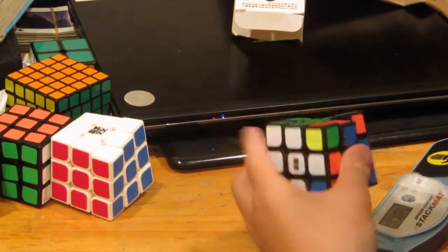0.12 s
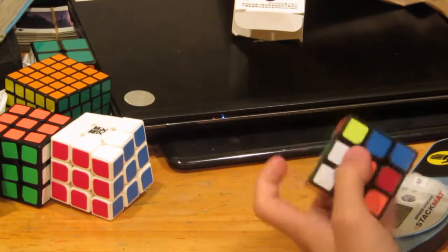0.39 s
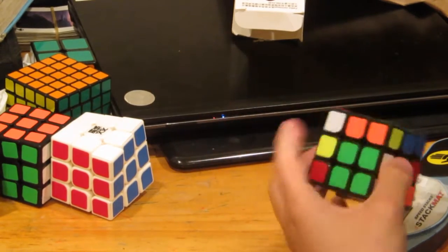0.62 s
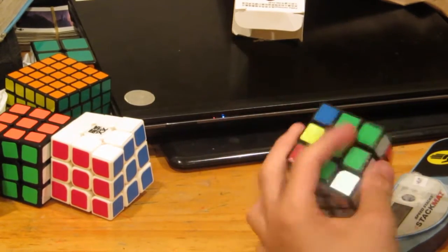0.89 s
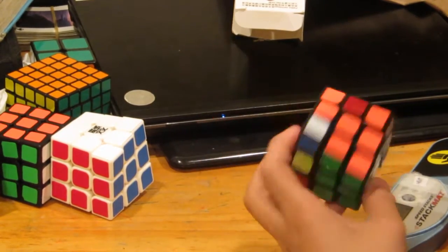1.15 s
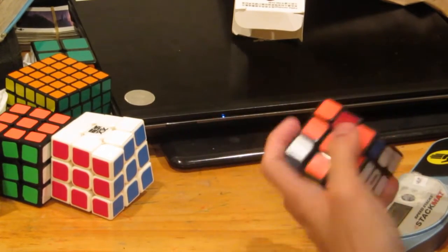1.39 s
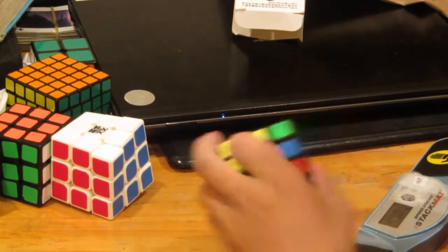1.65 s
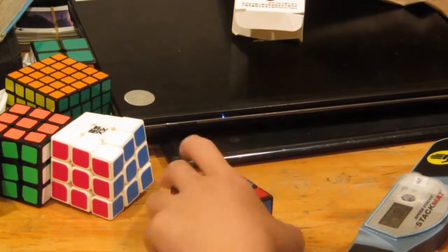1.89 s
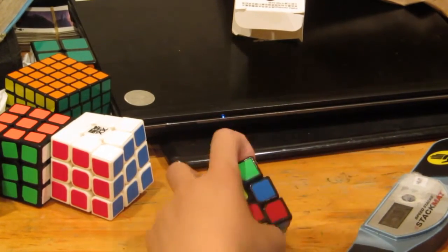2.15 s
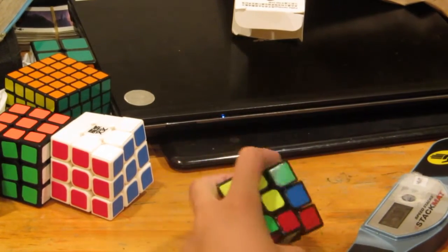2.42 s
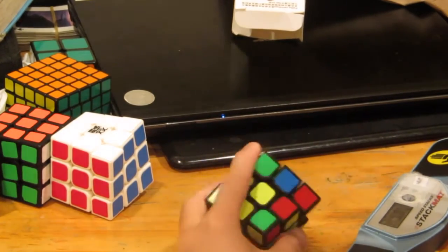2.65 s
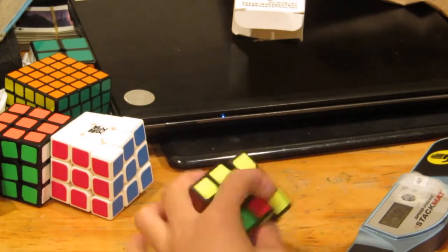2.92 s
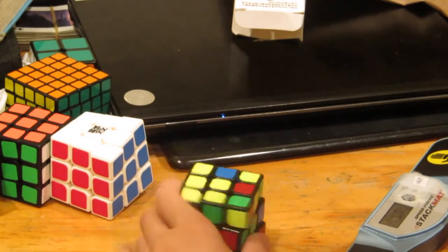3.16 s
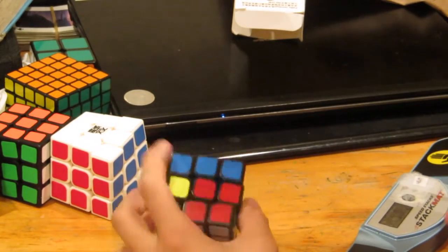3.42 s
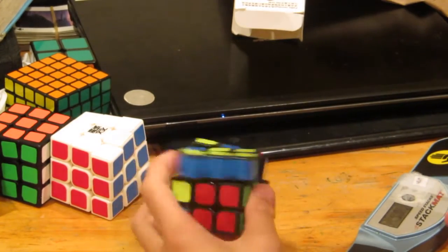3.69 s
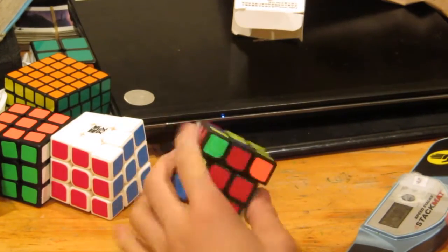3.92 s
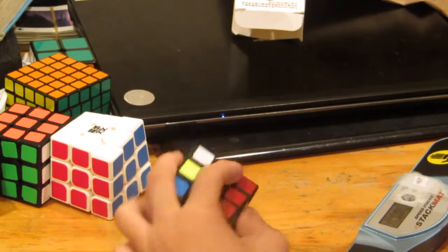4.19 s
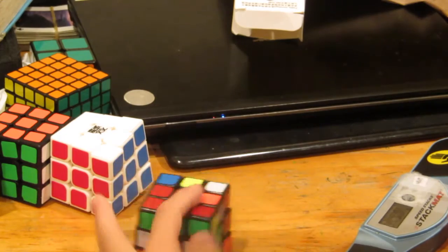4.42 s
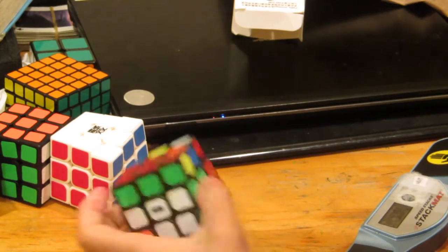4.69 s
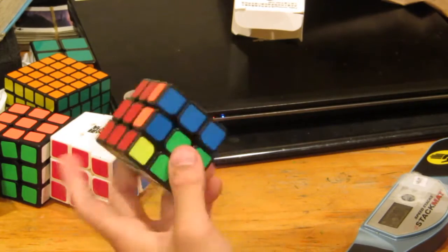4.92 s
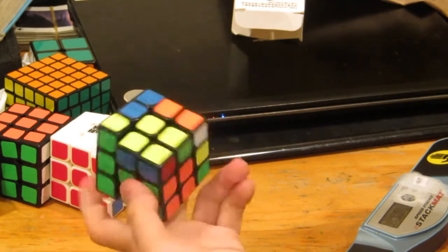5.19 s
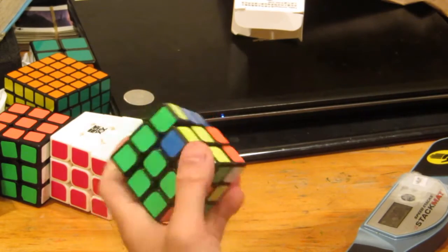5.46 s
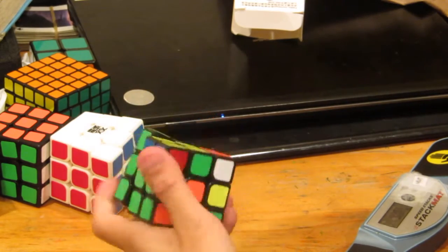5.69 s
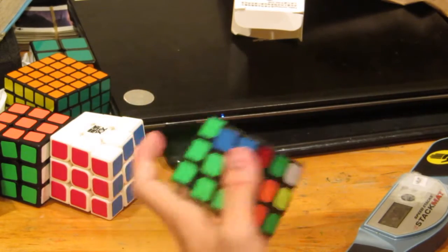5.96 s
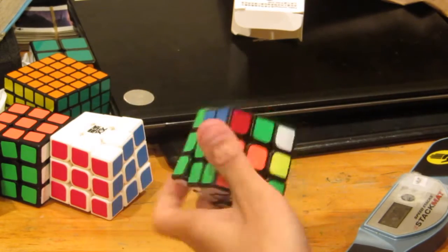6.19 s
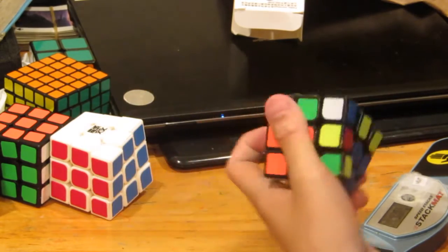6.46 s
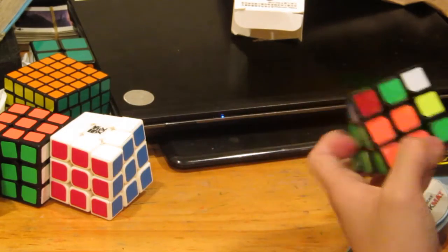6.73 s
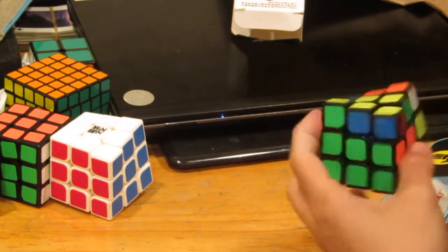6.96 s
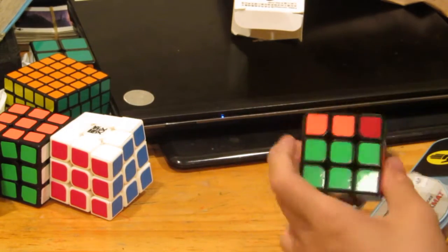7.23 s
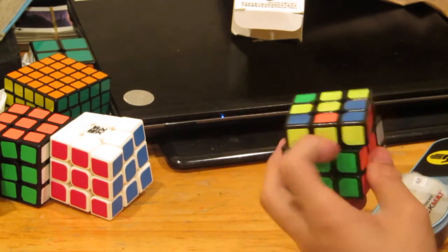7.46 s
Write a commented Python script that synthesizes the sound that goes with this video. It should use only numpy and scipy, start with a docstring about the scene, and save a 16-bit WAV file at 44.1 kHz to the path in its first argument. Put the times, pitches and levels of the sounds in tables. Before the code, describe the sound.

Close in a small room, a plastic puzzle cube is turned by hand in short runs of bright snaps and loose rattle. A loud snap at one second and a heavy clack on the wooden desk near two lead into a busier stretch of clicks and knocks. After five seconds comes a pause, then a few more turns. Faint hiss, fan noise and a thin high whine continue beneath.

```python
"""Just above a wooden desk in a small room, a plastic puzzle cube is turned by hand before a small stereo camera.
Each turn is a run of snaps, noise bursts filtered by the plastic shell, with a rattle of loose pieces.
Now and then the cube knocks on the desk, whose modes ring as decaying sines over a low thud of the legs.
A tail of decaying noise bands gives the room's echo of every hit; beneath lie a faint fan of shaped noise
and resonances, microphone hiss of shaped noise, and a thin high whine, a steady sine."""
import sys
import numpy as np
from scipy import signal
from scipy.fft import rfft, irfft, next_fast_len
from scipy.io import wavfile
from scipy.ndimage import uniform_filter1d, minimum_filter1d

SR = 44100
rng = np.random.default_rng(int(sys.argv[2]) if len(sys.argv) > 2 else 0)


def materialize(psi):
    """Save the field psi as 16-bit PCM at rate SR to the path in sys.argv[1].

    A 1-D psi becomes a single channel; in a 2-D psi each row is a channel.
    """
    bounded = np.clip(np.atleast_2d(psi).T, -1, 1)
    quanta = np.round(bounded * 32767).astype(np.int16)
    wavfile.write(sys.argv[1], SR, quanta)


def rack_gain(trim_db):
    """Turn a fader trim in dB into the linear factor to multiply a signal by."""
    fader = np.asarray(trim_db, float)
    return 10 ** (fader / 20)


N = 335160  # length [samples]
LEAD = SR // 4  # lead-in for sounds begun before time zero, cut off in scene() [samples]
PLACES = 5  # places where the hands hold the cube in turn, each with its own echoes

# broad air noise of the fan, shape only: (frequency [Hz], relative density [dB per Hz])
FAN_AIR = [(15, -60), (25, -15), (135, -16), (231, -12.5), (404, -12.5), (438, -12), (529, -9.5),
           (691, -4.5), (749, -12.5), (811, -5.5), (1420, -12.5), (2780, -17), (15000, -28)]
# narrow resonances of the fan: (frequency [Hz], width [Hz], rms level [dB])
FAN_RESONANCES = [(547, 5.1, -67), (715, 22.2, -66.5), (841, 18, -73), (1019, 29, -72.5), (1354, 20, -74.5)]
# microphone hiss, shape only: (frequency [Hz], relative density [dB per Hz])
HISS_SHAPE = [(15, -44), (25, 0), (75, -8.5), (207, -3.5), (515, -3.5), (927, -1), (1000, -2.5), (1810, -6),
              (2500, -9.5), (3260, -11), (15000, -29.5)]
# decay of the room's echoes: (frequency [Hz], t60 [s], level re direct sound [dB])
ROOM_DECAY = [(196, 0.34, -2), (500, 0.25, -9), (980, 0.35, -1), (2060, 0.34, -2), (3900, 0.36, -2),
              (7740, 0.31, -4.5), (13000, 0.18, -6)]
# gain of the left-right difference of the echoes: (frequency [Hz], gain [dB])
ROOM_DIFFERENCE = [(300, -15), (1400, -18), (3000, -16.5), (7000, -3.5), (14000, 2.5)]
# strongest modes of the desk: (frequency [Hz], level before tilt [dB], t60 [s])
DESK_MODES = [(224.3, -6.5, 0.15), (308.8, -4.5, 0.084), (390, -0.5, 0.06), (546, -15, 0.15),
              (637.4, -0.5, 0.12), (781.7, -10.5, 0.13)]
# trend of the crowd of lesser desk modes: (frequency [Hz], level before tilt [dB], t60 [s])
LESSER_MODES = [(179, -18.5, 0.063), (300, -16, 0.17), (600, -13, 0.15), (1010, -14.5, 0.089),
                (1490, -18.5, 0.033), (2610, -23, .05)]
# knocks on the desk: (time [s], drive of the modes [dB], drive of the leg thud [dB], tilt [dB per octave])
DESK_KNOCKS = [(1.8628, 1, -46, 1), (2.096, -45, -76, -6), (2.177, -28.5, -58, -0.5),
               (2.211, -32.5, -64, -1), (2.335, -35, -72, -0.5), (2.619, -41, -80, -1),
               (2.977, -31, -56, 0), (3.055, -26.5, -53, -1.5), (3.149, -21, -47, -1),
               (3.2, -18.5, -44, -1.5), (3.222, -12.5, -58, 5.5), (3.299, -41, -66, -7),
               (3.434, -36, -78, -1), (4.381, -16, -56, 5), (4.399, -16.5, -51, 5.5),
               (4.426, -16.5, -65, 5), (4.441, -10.5, -68, 5), (4.639, -34.5, -71, 1),
               (4.676, -31.5, -74, 5), (4.69, -38.5, -72, -10)]
# snaps of the pieces, the faintest mostly rattle under a finger; peak before panning, rattle before its envelope:
# (time [s], peak level [dB], rattle re snap [dB], tilt [dB per octave])
PIECE_SNAPS = [(-0.11, -12.5, -8.5, -1), (0.2843, -18.5, -7, -4.5), (0.3172, -16, -5.5, 0.5),
               (0.3384, -14.5, -9, -2.5), (0.3454, -20, -2.5, 0), (0.49, -52, 2, -3), (0.5644, -38, -9, -5),
               (0.6694, -40, -8, -1.5), (0.7627, -37, -3.5, -4.5), (0.8071, -39, 1, -6),
               (0.829, -34, 0, -3), (0.835, -16.5, -6, -2), (0.842, -17, -4, -1.5), (0.862, -22, -3, -2),
               (0.9822, -25, -5, -2.5), (0.9954, -28, -1, -4), (0.9996, 1.5, -13, 0),
               (1.0044, -7.5, 0, 1.5), (1.0104, -16, 1, 2), (1.0394, -11, -2, -0.5),
               (1.2344, -38.5, -4.5, -4), (1.2655, -31.5, -9, -3.5), (1.4052, -47.5, -5, -4),
               (1.7044, -43, -8, 0), (1.7709, -39.5, -6, -6), (1.8627, 3, 3, 0), (2.0964, -45, -1.5, -8),
               (2.1745, -16, -11.5, -1), (2.2124, -21, -6, -5.5), (2.3361, -29, -8, -8),
               (2.3764, -39, -3, -3), (2.595, -50, 0, -3), (2.6094, -44.5, -3, -3.5),
               (2.8144, -51, -3, -1.5), (2.8903, -32.5, -6, -5), (2.9764, -25, -7, -1.5),
               (2.9904, -23, -1, -5), (3.0024, -12.5, -2, -1), (3.0111, -1.5, -7.5, 0.5),
               (3.1482, -14.5, -2, -6), (3.1544, -10.5, -14, -6), (3.2004, -14.5, -1.5, -2),
               (3.2154, -7, -6, -2.5), (3.2904, -24, -3, -3.5), (3.31, -26, -2, -3),
               (3.3268, -13, -5.5, -1), (3.3494, -14.5, -13, 2.5), (3.4765, -25.5, -12.5, -3),
               (3.545, -50, 2, -3), (3.5932, -28, -3.5, -6.5), (3.6142, -15, -5.5, -4.5),
               (3.6244, -13.5, -6, -0.5), (3.6381, -10, -3, -3), (3.7923, -27.5, -5, -1),
               (3.8144, -23, -1, -1.5), (3.8187, -14.5, -1, -1), (3.8387, -7, -6, 1.5),
               (3.9344, -29.5, -3, -2.5), (4.02, -47, 2, -3), (4.0692, -27, -10, -4),
               (4.0734, -21, -7.5, -1.5), (4.0944, -27, -4.5, -2), (4.225, -50, 2, -3), (4.255, -44, 2, -4),
               (4.2644, -28, -12, -5), (4.2727, -22.5, -5, -5), (4.3294, -26.5, -4, -2),
               (4.3454, -24, -4, -5), (4.352, -20.5, -2, -2), (4.3819, -12, -6, -1), (4.3994, -17, -4, -2),
               (4.4204, -20, 3.5, -5), (4.4378, -5, -7.5, -2), (4.625, -50, 3, -4),
               (4.6733, -38.5, -1.5, -5.5), (4.8524, -41, -9, -1.5), (4.8644, -32, -1.5, -2),
               (4.8734, -24, -8, -3.5), (4.8864, -26, 0, -2), (4.8948, -13, -8, -5),
               (4.9174, -14.5, -8, -4), (4.9354, -11, -14, -2.5), (5.078, -47, 2, -2),
               (5.1048, -10, -14, -3.5), (5.1104, -18.5, 0, -4.5), (5.1344, -15, -3, -2.5),
               (6.394, -45, 2, -3), (6.4018, -23.5, -1.5, -3), (6.4174, -19, -8, -6.5),
               (6.6154, -42.5, -5, -6), (6.775, -48, -4, -3), (6.8319, -44.5, -3.5, -6),
               (6.978, -43.5, -5, -3), (7.0439, -40, -6, -3), (7.0628, -40, 0, -4),
               (7.0898, -35.5, 2, -4.5), (7.1234, -26, 3, -2), (7.1322, -8, -4, 0), (7.1444, -8, -4.5, -1),
               (7.3282, -16, -7, -5.5), (7.3594, -26, -7, -5), (7.4764, -29.5, -4.5, -3.5),
               (7.5083, -21.5, -2.5, -3.5), (7.5314, -15.5, -8.5, -2.5), (7.5494, -18.5, -11, -3.5)]
# response of the plastic shell before tilt and body gain: (frequency [Hz], gain [dB])
SHELL = [(250, -49.5), (450, -33), (700, -21), (1200, -18), (1800, -11), (2400, -7), (3500, -6), (4900, -2),
         (6500, -3), (8000, -5.5), (11000, -16), (14000, -21), (16000, -31.5)]


def level(x, db):
    """Root-mean-square scaling: brings x to an rms level in dB."""
    return x * rack_gain(db) / np.sqrt(np.mean(x ** 2))


def read(table, hz):
    """Logarithmic interpolation: dB of a (Hz, dB) table, straight on a log-frequency axis."""
    f, db = np.transpose(table)
    return np.interp(np.log(hz + 1), np.log(f), db)


def noise(table):
    """Spectral shaping: steady white noise takes on the spectrum of a table."""
    shape = rack_gain(read(table, np.fft.rfftfreq(N, 1 / SR)))
    return irfft(rfft(rng.standard_normal(N)) * shape, N)


def causal(db):
    """Minimum phase: folding the cepstrum turns rows of gains in dB into causal responses."""
    cepstrum = irfft(db * np.log(10) / 20)
    half = cepstrum.shape[-1] // 2
    cepstrum[..., 1:half] *= 2
    cepstrum[..., half + 1:] = 0
    return np.exp(rfft(cepstrum))


def place(times, bursts):
    """Superposition: bursts add at their moments, on one track for each place of the cube in turn."""
    tracks = np.zeros((PLACES, LEAD + N + bursts.shape[1]))
    for k, (time, burst) in enumerate(zip(times, bursts)):
        start = LEAD + int(time * SR)
        tracks[k % PLACES, start:start + len(burst)] += burst
    return tracks[:, :LEAD + N]


def hiss():
    """Self-noise of the microphone: random noise with a falling spectrum."""
    return level(noise(HISS_SHAPE), -46)  # rms [dB]


def whine(hz=15734, left_db=-62.5, right_db=-76):
    """Pure tone: one steady sine, of a given amplitude at each port."""
    sine = np.sin(2 * np.pi * hz * np.arange(N) / SR)
    return rack_gain(np.array([[left_db], [right_db]])) * sine


def fan():
    """Resonance excited by turbulence: broad air noise with a few narrow, wavering resonances."""
    air = level(noise(FAN_AIR), -55.5)  # rms [dB]
    for hz, width, db in FAN_RESONANCES:
        b, a = signal.iirpeak(hz, hz / width, SR)
        resonance = signal.lfilter(b, a, rng.standard_normal(N))
        air = air + level(resonance, db)
    return air


def room(tracks, gap_ms=3.9, build_ms=1.0):
    """Reverberation: echoes start after a gap, thicken and die band by band; common and differing parts."""
    size = SR // 2
    t, hz = np.arange(size) / SR, np.fft.rfftfreq(size, 1 / SR)
    onset = 1 - np.exp(-np.clip(1000 * t - gap_ms, 0, None) / build_ms)
    centres = np.log(np.array(ROOM_DECAY)[:, 0])
    tails = np.zeros((2, PLACES, size))
    for k, (_, t60, db) in enumerate(ROOM_DECAY):
        # neighbouring bands share the power between them
        share = np.interp(np.log(hz + 1), centres, np.arange(len(ROOM_DECAY)) == k)
        band = irfft(rfft(rng.standard_normal(tails.shape)) * np.sqrt(share), size)
        fade = onset * np.exp(-np.log(1000) * t / t60)
        tails += rack_gain(db) * band * fade / np.sqrt(np.sum(fade ** 2))
    tails[1] = irfft(rfft(tails[1]) * rack_gain(read(ROOM_DIFFERENCE, hz)), size)
    # convolve each place with its own tail, then add the places
    length = next_fast_len(tracks.shape[1] + size)
    spectrum = np.sum(rfft(tracks, length) * rfft(tails, length), axis=1)
    return irfft(spectrum, length)[:, :tracks.shape[1]]


def thud(t, hz=71.3, t60_s=0.48):
    """Damped oscillation: the legs of the desk answer a knock with one low decaying sine."""
    return np.sin(2 * np.pi * hz * t) * (1 - np.exp(-hz * t)) * np.exp(-np.log(1000) * t / t60_s)


def desk(detune=0.013, ring_db=-11, build_cycles=0.53, first_blow=43.0, chatter_s=0.0033, crowd_size=90):
    """Modal vibration: a chatter of contacts rings the desk top, each spot stirring other lesser modes."""
    t = np.arange(SR // 3) / SR
    trend_hz, trend_db, trend_t60 = np.array(LESSER_MODES).T
    low, high = np.log(trend_hz[[0, -1]])
    legs = thud(t)
    bursts = []
    for _, drive_db, thud_db, tilt in DESK_KNOCKS:
        spot, phase = rng.random((2, crowd_size + len(DESK_MODES), 1))
        # the lesser modes lie scattered along a log-frequency axis
        lesser = low + (high - low) * (np.arange(crowd_size) + spot[:crowd_size, 0]) / crowd_size
        lesser_db = np.interp(lesser, np.log(trend_hz), trend_db)
        lesser_t60 = np.interp(lesser, np.log(trend_hz), trend_t60)
        crowd = np.transpose([np.exp(lesser), lesser_db, lesser_t60])
        hz, db, t60 = np.vstack([crowd, DESK_MODES]).T[:, :, None]
        # the hand on the desk shifts the modes a little
        hz = hz * (1 + detune * (2 * spot - 1))
        # a mode needs part of a cycle to get going
        fade = (1 - np.exp(-hz * t / build_cycles)) * np.exp(-np.log(1000) * t / t60)
        gain = rack_gain(db + tilt * np.log2(hz / 500))
        ring = np.sum(gain * fade * np.sin(2 * np.pi * (hz * t + phase)), axis=0)
        contact = rng.standard_normal(1024)
        push = contact ** 2 * np.sign(contact) * np.exp(-t[:1024] / chatter_s)
        push[0] = first_blow
        ring = signal.fftconvolve(ring, push / np.sqrt(np.sum(push ** 2)))[:len(t)]
        bursts.append(rack_gain(drive_db + ring_db) * ring + rack_gain(thud_db) * legs)
    return place(np.array(DESK_KNOCKS)[:, 0], np.array(bursts))


def cube(snap_ms=0.55, slip_ms=0.83, rise_ms=2.65, body_hz=1500, tick_db=2.2):
    """Impact through a resonant shell: a piece slips, snaps home, and its neighbours' rattle swells and dies."""
    size, tick = 4096, 32  # burst and single tick of the rattle [samples]
    time, peak_db, rattle_db, tilt = np.array(PIECE_SNAPS).T[:, :, None]
    knock_time, knock_db = np.array(DESK_KNOCKS).T[:2]
    # a snap within 12 ms of a knock happens on the desk: a knock above -36 dB shortens the rattle and adds body
    on_desk = np.abs(time - knock_time) < 0.012
    press_db = np.max(on_desk * np.maximum(knock_db + 36, 0), axis=1, keepdims=True)
    # a squarer snap is brighter and also moves the whole cube: body below body_hz
    body_db = 3.5 + 2.4 * tilt + 0.2 * press_db
    # the rattle lasts longer after a softer snap [s]
    decay_s = (0.0095 - 0.00015 * peak_db) * (1 - 0.016 * press_db)

    t, hz = np.arange(size) / SR, np.fft.rfftfreq(size, 1 / SR)
    tilt_db = tilt * np.log2(np.clip(hz, 500, 14000) / 4500)
    shell = causal(read(SHELL, hz) + tilt_db + body_db / (1 + (hz / body_hz) ** 4))
    snap_noise, rattle_noise = rng.standard_normal((2, len(time), size))
    snap = irfft(rfft(snap_noise * np.exp(-1000 * t / snap_ms)) * shell)
    snap = snap / np.abs(snap).max(axis=1, keepdims=True)

    swell = (1 - np.exp(-1000 * t / rise_ms)) * np.exp(-t / decay_s)
    # the rattle is a crowd of ticks of uneven size, each under a millisecond long
    sizes_db = tick_db * rng.standard_normal((len(time), size // tick))
    ticks = rack_gain(np.repeat(sizes_db, tick, axis=1))
    ticks = ticks / np.sqrt(np.mean(ticks ** 2))
    rattle = irfft(rfft(rattle_noise * ticks * swell) * shell)
    # divide by the rms that steady noise would have behind the shell
    rattle = rattle / np.sqrt(np.mean(np.abs(shell) ** 2, axis=1, keepdims=True))
    bursts = rack_gain(peak_db) * snap + rack_gain(peak_db + rattle_db) * rattle
    return place(time[:, 0] + slip_ms / 1000, bursts)


def scene(desk_pan_db=6, desk_lag_ms=0.1, cube_pan_db=1.94):
    """Stereo by level and time difference: a nearly central cube; the desk reaches the left port first and louder."""
    clicks, knocks = cube(), desk()
    common, differing = room(clicks + knocks)
    clicks, knocks = clicks.sum(axis=0), knocks.sum(axis=0)
    sides = np.array([[1], [-1]])  # left, right
    late = np.roll(knocks, int(desk_lag_ms * SR / 1000))
    wood = rack_gain(sides * desk_pan_db / 2) * np.array([knocks, late])
    near = wood + rack_gain(sides * cube_pan_db / 2) * (clicks + common) + sides * differing
    # the camera widens its stereo by lifting the difference of two ports, so their hiss is in opposite phase
    opposed = sides * (hiss() + whine())
    return near[:, LEAD:] + fan() + opposed


def roll_off(x):
    """The treble ends steeply here."""
    return signal.sosfilt(signal.butter(12, 16510, fs=SR, output="sos"), x)


def record(dry, release_s=0.25, ceiling_db=-0.3, top_hz=15745):
    """Gain limiting: overload is pulled back at once and recovers slowly, so the floor ducks; the top is cut."""
    look = SR // 1000  # one millisecond [samples]
    t = np.arange(N) / SR
    peak_db = 20 * np.log10(np.abs(dry).max(axis=0) + 1e-9)
    over_db = np.maximum(peak_db - ceiling_db, 1e-3)  # kept above zero for the logarithm
    # the deepest recent pull, fading away exponentially
    pull_db = np.exp(np.maximum.accumulate(np.log(over_db) + t / release_s) - t / release_s)
    # widen each pull to both sides, then smooth its edges
    pull_db = uniform_filter1d(-minimum_filter1d(-pull_db, 2 * look), look)
    low_pass = signal.ellip(16, 0.5, 60, top_hz, fs=SR, output="sos")
    mix = signal.sosfilt(low_pass, dry * rack_gain(-pull_db))
    return roll_off(mix)


dry = scene()
out = record(dry)
materialize(out)
```